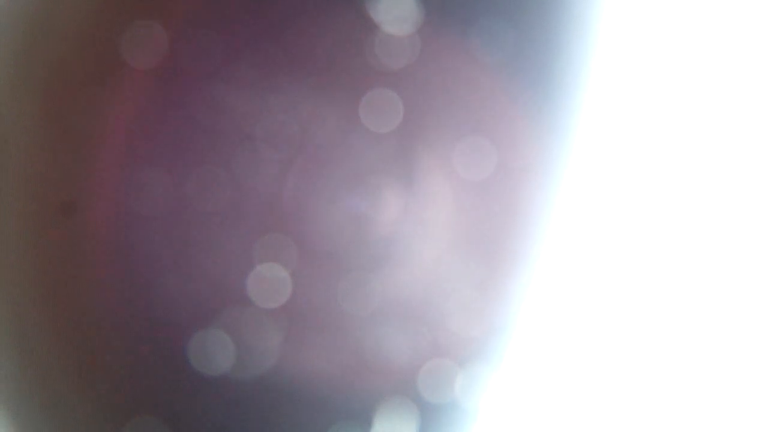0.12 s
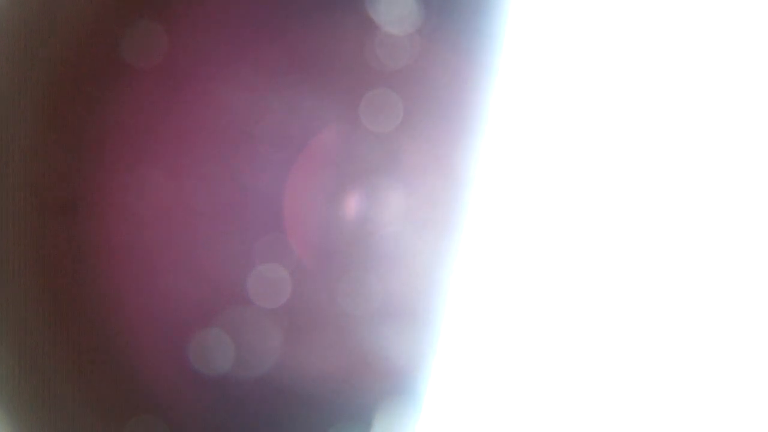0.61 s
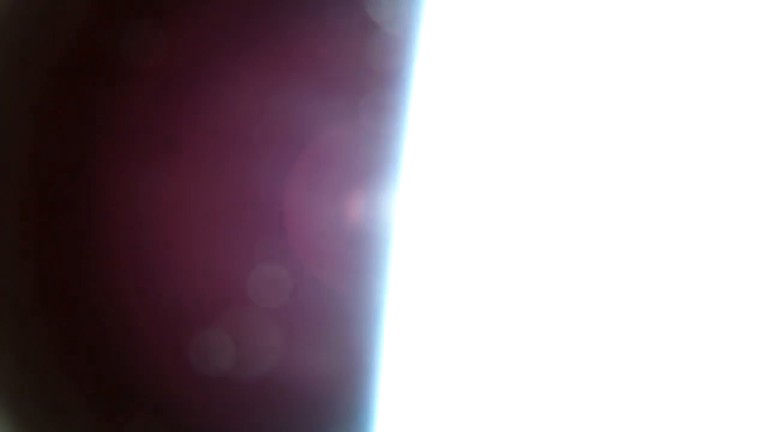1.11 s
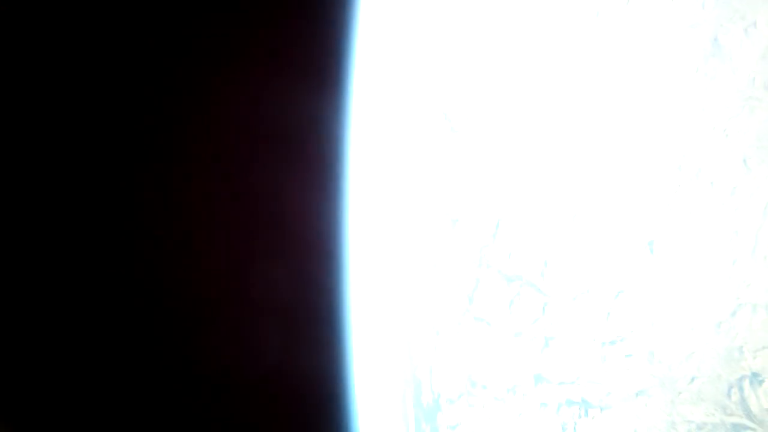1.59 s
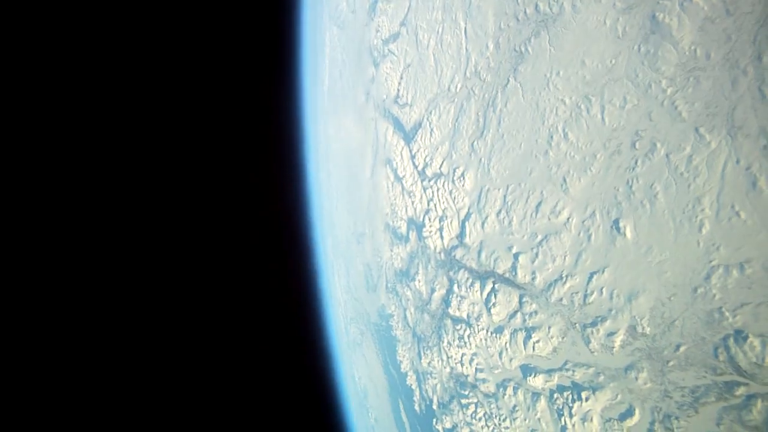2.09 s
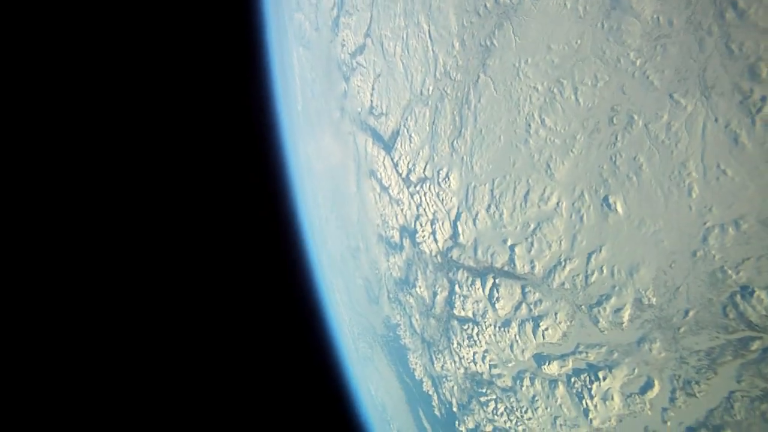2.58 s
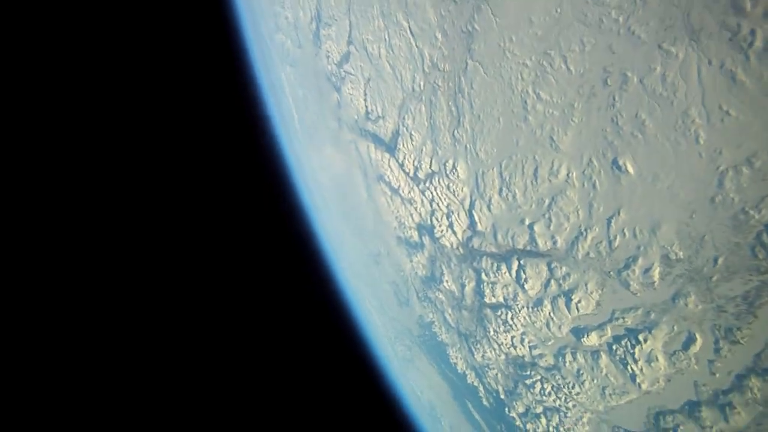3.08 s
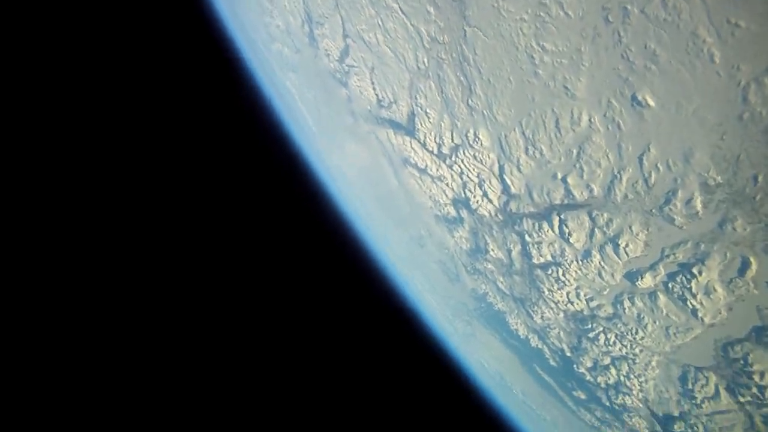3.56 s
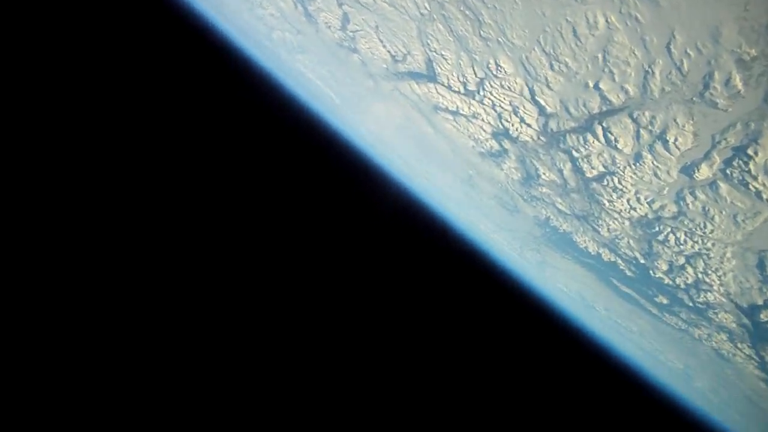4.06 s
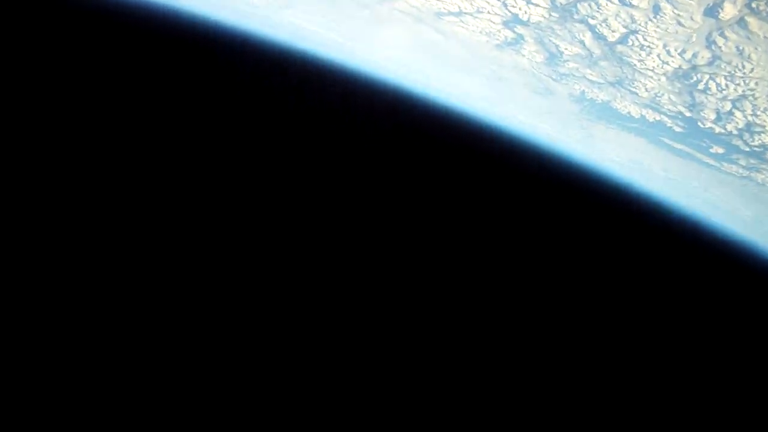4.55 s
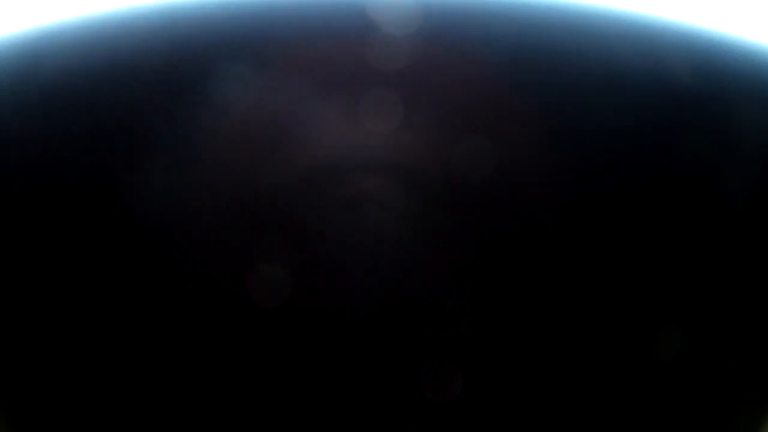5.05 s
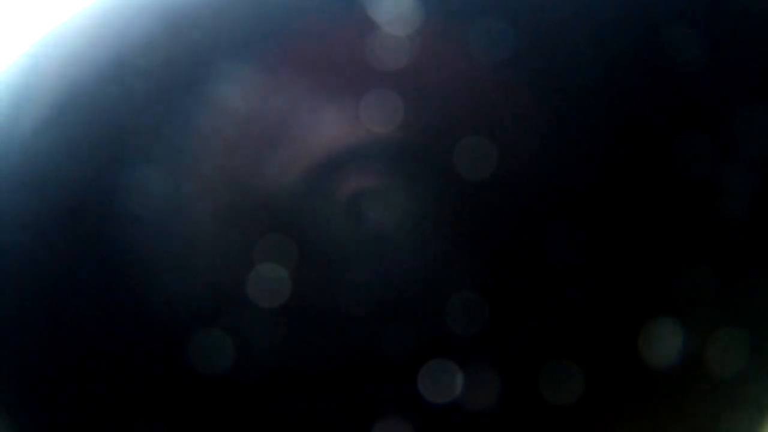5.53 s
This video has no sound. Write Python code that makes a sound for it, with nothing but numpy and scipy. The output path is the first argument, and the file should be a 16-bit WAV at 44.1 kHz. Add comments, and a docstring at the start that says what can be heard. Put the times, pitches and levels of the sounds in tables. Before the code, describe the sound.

Sound carried through the structure of a rocket coasting in space, dry and centred, with a gritty low-rate sampled character. From 0 to about 0.8 s, faint low rumbling and soft groans, roughly 50 to 120 Hz, swell and fade as the mount rocks. Under them and long after, a very quiet hum near 370 Hz throbs twenty times a second, wavering in strength, thinning around 3.4 s, with weak higher tones and steady faint hiss. At about 4.44 s a tiny whistle slides upward for under a tenth of a second, and a faint gas leak begins. Around 4.76 to 4.86 s a valve knocks in two quick pairs, dull thumps with short hollow rings. From 4.9 s the jet swells steeply, first hollow and resonant, then by 5.2 s a massive roar centred around 350 to 900 Hz, with low buffeting, sizzle and thin spray, fluctuating loudly, easing slightly before the end at about 5.7 s.

```python
"""Aboard a coasting rocket, a drive stepping twenty times a second makes the airframe hum and throb over faint hiss.
In the first second the mount rocks and groans: slow noise and low tones that swell and fade.
Near the end gas starts to leak, with a short rising whistle; then a valve knocks, as low swings with short rings.
The gas jet grows into a roar, built from layers of shaped noise that follow one flow curve.
Throughout, slow sampling with held samples puts copies of the sound on both sides of 12 kHz."""
import sys
import numpy as np
from scipy import signal
from scipy.io import wavfile
from scipy.ndimage import uniform_filter1d, map_coordinates

SR = 44100
rng = np.random.default_rng(int(sys.argv[2]) if len(sys.argv) > 2 else 0)


def invert_db(level):
    """Linear amplitude ratio for a level in decibels (20 dB per decade), elementwise."""
    return 10 ** (np.asarray(level, dtype=float) / 20)


def store_wav(level_fs):
    """Save 16-bit WAV to argv[1]."""
    pcm = np.round(np.clip(np.atleast_2d(level_fs), -1, 1) * 32767)
    wavfile.write(sys.argv[1], SR, pcm.T.astype(np.int16))


N = 249606  # length in samples
STEP_HZ = 20.04  # rate of the drive's steps

# In every noise spectrum below, level is relative power per Hz; noise() evens out the total.
# quiet air and structure noise with a faint narrow whine: f/Hz, level/dB
FLOOR_SPECTRUM = [(10, -20), (20, -3.5), (60, -10), (150, -12.5), (300, -17.5), (500, -20), (1000, -24),
                  (2000, -28), (3420, -30.5), (3520, -25.5), (3620, -31.5), (5200, -32.5), (7000, -29.5)]
# strength of the mount's slow rocking: t/s, level/dB
ROCKING_LEVEL = [(0.0, -49), (0.07, -51.5), (0.1, -69), (0.17, -48.5), (0.49, -51), (0.52, -58), (0.7, -60)]
# sound of the rocking: f/Hz, level/dB
ROCKING_SPECTRUM = [(5, -6), (15, 0), (40, -5.0), (60, -20), (150, -22.5), (250, -44)]
# low groans of the mount: start t/s, length/s, f/Hz, level at the top of the swell/dB
GROANS = [(0.11, 0.071, 51, -50), (0.148, 0.14, 101, -64), (0.183, 0.14, 52, -43), (0.274, .18, 117, -52),
          (0.37, 0.16, 56.6, -44.5), (0.517, 0.15, 82, -50), (0.68, 0.13, 70, -57.5)]
# main airframe resonance, which drifts a little: t/s, hum level/dB, f/Hz
MAIN_HUM = [(0.0, -55.5, 369.2), (0.55, -59.5, 369.8), (0.8, -54, 374), (0.94, -56.5, 366.5),
            (1.04, -54, 364), (1.24, -62, 379), (1.54, -60, 363), (1.66, -57, 365.6), (2.03, -57, 368.3),
            (2.48, -55.5, 369.6), (2.58, -56, 368.7), (2.84, -53.5, 370.4), (3.25, -57.5, 374.8),
            (3.36, -69, 376), (3.44, -63, 371), (3.94, -58.5, 370.8), (4.19, -62, 375),
            (4.34, -59.5, 373.3), (4.73, -58.5, 374), (4.85, -63, 380)]
# close pair of higher resonances: t/s, level of the lower/dB, level of the upper/dB
UPPER_PAIR = [(0.0, -86, -78), (1.1, -80, -80), (1.3, -79, -77), (2.2, -86, -77), (3.1, -78, -70),
              (3.6, -77, -76), (4.45, -78, -81)]
# weak overtones that come and go: multiple of the step rate
OVERTONES = [15, 16, 17, 22, 23]
# middle strength of each overtone: level/dB
OVERTONE_LEVELS = [-81, -92.5, -77, -78, -85]
# moments when the throb slips against the steps: start t/s, length/s, shift/ms
THROB_SLIPS = [(0.72, .18, 18), (0.9, .18, -18), (1.5, .12, 18.7), (3.3, .5, 2.5), (3.9, .2, -3.7)]
# valve blows: t/s, thump level/dB, thump f/Hz, ring level before its soft start/dB
KNOCKS = [(4.755, -42, 60, -46), (4.766, -31, 85, -28), (4.825, -42, 70, -31), (4.855, -28, 70, -36)]
# gas, first a leak and then the open jet: t/s, flow level/dB, turbulence (0 to 1)
JET_FLOW = [(4.45, -64.5, 0.0), (4.66, -56, 0.01), (4.73, -59, 0.0), (4.75, -53, 0.1), (4.77, -44.5, 0.24),
            (4.79, -47, 0.16), (4.93, -28.5, 0.04), (5.0, -23, 0.04), (5.045, -17.5, 0.0),
            (5.15, -15.5, 0.56), (5.28, -13, 0.99), (5.44, -12.5, 0.58), (5.59, -14.5, 0.83),
            (5.72, -18.5, 0.5)]
# roar at low turbulence, where wall resonances stand out: f/Hz, level/dB
YOUNG_ROAR = [(130, -65), (220, -26.5), (379, -4.5), (433, -3.5), (491, -4.5), (529, -8.5), (609, -8),
              (790, -10.5), (857, -9), (1300, -30), (1690, -63.5), (2860, -120)]
# roar at full turbulence: f/Hz, level/dB
FULL_ROAR = [(130, -41), (220, -21.5), (354, -4), (459, -2), (557, -6.5), (651, -5.5), (761, -8.5),
             (877, -6), (1300, -20.5), (1690, -56.5), (2860, -120)]
# low buffeting of the structure: f/Hz, level/dB
BUFFET_SPECTRUM = [(7.1, -37), (12, -12.5), (64, 5), (113, -3.5), (172, -8), (205, -15.5), (220, -16.5),
                   (290, -51.5), (480, -120)]
# sizzle above the roar: f/Hz, level/dB
SIZZLE_SPECTRUM = [(760, -40), (1300, -2), (1490, -3), (1590, -8), (1790, -8), (2090, -13), (2660, -13.5),
                   (4100, -40), (5330, -74), (9020, -120)]
# thin top hiss of the spray: f/Hz, level/dB
SPRAY_SPECTRUM = [(2500, -19.5), (3500, -0.5), (4300, -7), (5300, -2.5), (6000, -12), (7000, -12)]


def evened(x):
    """Scales a signal to an average strength (rms) of 1."""
    return x / np.sqrt(np.mean(x ** 2) + 1e-20)


def follow(rows):
    """Reads a table's curves at every sample, plus a soft-edged window that is open while the table lasts."""
    s, *columns = np.transpose(rows)
    t = np.arange(N) / SR
    is_open = 1.0 * (t >= s[0]) * (t <= s[-1])
    return [np.interp(t, s, c) for c in columns], uniform_filter1d(is_open, size=300)


def swell(start, length):
    """Gives progress 0-1 through an event (in s) at every sample, and its rounded rise and fall."""
    done = np.clip((np.arange(N) / SR - start) / length, 0, 1)
    return done, np.sin(np.pi * done)


def glide(hz):
    """Adds up a changing pitch into the running phase of a tone."""
    return 2 * np.pi * np.cumsum(hz) / SR


def drift(rate):
    """Wanders smoothly through random points, 'rate' of them a second, with an rms of about 1."""
    knots = rng.standard_normal(int(N / SR * rate) + 2)
    coarse = np.arange(0, N + 64, 64)
    curve = map_coordinates(knots, [coarse / SR * rate], order=3)
    return np.interp(np.arange(N), coarse, curve)


def noise(spectrum, patchy_db, flicker_db):
    """Makes noise of rms 1 from random short spectra, with patches in time and pitch and a shared flicker."""
    frames, hz = N // 256 + 5, np.fft.rfftfreq(1024, 1 / SR)
    real, imaginary, patches = rng.standard_normal((frames, 513, 3)).T
    patches = uniform_filter1d(patches, size=4, axis=0)  # smooth over pitch
    patches = evened(uniform_filter1d(patches, size=8, axis=1))  # smooth over time
    f, level_db = np.transpose(spectrum)
    shape_db = np.interp(np.log(hz + 1), np.log(f + 1), level_db, left=-120, right=-120)[:, None]
    flicker = evened(uniform_filter1d(rng.standard_normal(frames), size=3))
    gain = invert_db(shape_db + patchy_db * patches + flicker_db * flicker)
    spectra = (real + 1j * imaginary) * gain
    return evened(signal.istft(spectra, nperseg=1024, noverlap=768)[1][:N])


def floor():
    """Quiet air and structure noise stays at one level throughout."""
    return invert_db(-61) * noise(FLOOR_SPECTRUM, patchy_db=0.4, flicker_db=0.2)


def mount():
    """The mount rocks slowly as low noise, and groans in low tones that swell and fade."""
    (rocking_db,), sounding = follow(ROCKING_LEVEL)
    out = invert_db(rocking_db) * sounding * noise(ROCKING_SPECTRUM, patchy_db=1.1, flicker_db=1.7)
    for start, length, hz, db in GROANS:
        envelope = swell(start, length)[1]
        out += np.sqrt(2) * invert_db(db) * envelope * np.cos(glide(np.full(N, hz)))
    return out


def ring(steps, late, first, centre_hz, half_width_hz, waver_db):
    """A resonance picks out four neighbouring multiples of the step rate, at a total power of about 1."""
    tones, power = 0, 0
    for k in range(4):
        off_centre = ((first + k) * STEP_HZ - centre_hz) / half_width_hz
        weight = 1 / (1 + off_centre ** 2)
        level = weight * invert_db(waver_db * drift(2.39))
        # the tones line up, and so peak together, when steps - late is a whole number
        turns = first * steps + k * (steps - late) + 0.059 * drift(5.77)
        tones = tones + level * np.cos(2 * np.pi * turns)
        power = power + weight ** 2
    return tones / np.sqrt(power)


def hum():
    """The steps ring the airframe at multiples of their rate; neighbours beat, giving a throb once a step."""
    steps = np.arange(N) / SR * STEP_HZ
    late_ms = 11  # where the throb first peaks inside a step
    for start, length, shift_ms in THROB_SLIPS:
        late_ms = late_ms + shift_ms * swell(start, length)[0]
    late = late_ms / 1000 * STEP_HZ

    (db, hz), sounding = follow(MAIN_HUM)
    out = sounding * invert_db(db) * ring(steps, late, first=18, centre_hz=hz, half_width_hz=10.8, waver_db=1.66)

    pair_db, sounding = follow(UPPER_PAIR)
    for db, hz in zip(pair_db, (788, 830)):
        out += sounding * invert_db(db) * ring(steps, late, first=39, centre_hz=hz, half_width_hz=6.9, waver_db=2.0)

    for multiple, db in zip(OVERTONES, OVERTONE_LEVELS):
        level = invert_db(db + 2.9 * drift(2.47))
        turns = multiple * steps + rng.random() + 0.16 * drift(0.63)
        out += level * np.cos(2 * np.pi * turns)
    return np.sqrt(2) * out  # a cosine of height 1 has an rms below 1


def valve():
    """Each blow is one low swing and a short ring of the housing, both dying away fast."""
    out, t = np.zeros(N), np.arange(3000) / SR
    for s, thump_db, thump_hz, ring_db in KNOCKS:
        # each loses 60 dB in the time given, in seconds
        thump = -np.sin(2 * np.pi * thump_hz * t) * invert_db(thump_db - 60 * t / 0.032)
        housing = np.sin(2 * np.pi * 620 * t) * invert_db(ring_db - 60 * t / 0.024)
        housing *= 1 - np.exp(-t / 0.0013)  # soft start
        out[round(s * SR):][:len(t)] += thump + housing
    return out


def whistle():
    """The leaking gas gives one short tone that rises in pitch."""
    done, leaking = swell(start=4.437, length=0.08)
    from_hz, to_hz = 380, 930
    hz = from_hz + (to_hz - from_hz) * done
    return invert_db(-57.5) * np.sqrt(np.abs(leaking)) * np.cos(glide(hz))


def jet():
    """Turbulent gas shakes the structure: roar, buffeting, sizzle, and a thin spray that grows slower than the roar."""
    (flow_db, turbulence), sounding = follow(JET_FLOW)
    grown = np.clip(turbulence, 0, 1)
    young = noise(YOUNG_ROAR, patchy_db=1.5, flicker_db=0.6)
    full = noise(FULL_ROAR, patchy_db=1.5, flicker_db=0.8)
    out = invert_db(flow_db) * (np.sqrt(1 - grown) * young + np.sqrt(grown) * full)

    # level = base dB + dB per dB of flow + dB added by full turbulence
    buffet = invert_db(-22.5 + 0.63 * flow_db + 11.8 * grown)
    sizzle = invert_db(-33.5 + 0.63 * flow_db + 14.1 * grown)
    spray = invert_db(-56.5 + 0.36 * flow_db + 0.12 * grown)
    out += buffet * noise(BUFFET_SPECTRUM, patchy_db=0.0, flicker_db=0.5)
    out += sizzle * noise(SIZZLE_SPECTRUM, patchy_db=0.5, flicker_db=1.3)
    out += spray * noise(SPRAY_SPECTRUM, patchy_db=0.0, flicker_db=3.0)
    return out * sounding


def scene():
    """All sound reaches the microphone through the structure, alike in both channels."""
    mono = floor() + mount() + hum() + valve() + whistle() + jet()
    return np.array([mono, mono])


def amplifier(dry):
    """A slightly lopsided amplifier flattens loud peaks softly and adds its own hiss to each channel."""
    headroom = 1.6  # level at which it flattens
    lopsided = dry - 0.08 * dry ** 2
    hiss = invert_db(-68.5) * rng.standard_normal(dry.shape)
    return headroom * np.tanh(lopsided / headroom) + hiss


def slow_sampler(sound):
    """Sampling at 12 kHz and holding each sample leaves copies on both sides of 12 kHz."""
    guard = signal.firwin(numtaps=63, cutoff=5550, window=("kaiser", 4.0), fs=SR)
    guarded = signal.oaconvolve(sound, guard[None], "same")
    fine = signal.resample_poly(guarded, 160, 147, axis=1)  # 44.1 to 48 kHz
    held = np.repeat(fine[:, ::4], 4, axis=1)  # each sample lasts four ticks of 48 kHz
    out = signal.resample_poly(held, 147, 160, axis=1)[:, :N]
    return np.pad(out, ((0, 0), (0, N - out.shape[1])))


def top_cut(x):
    """Nothing passes above the cut-off."""
    return signal.sosfilt(signal.butter(12, 15200, fs=SR, output="sos"), x)


def record(dry):
    """The sound passes through the amplifier and the slow sampler to become the finished mix."""
    finished = slow_sampler(amplifier(dry))
    return top_cut(finished)


dry = scene()
out = record(dry)
store_wav(out)
```